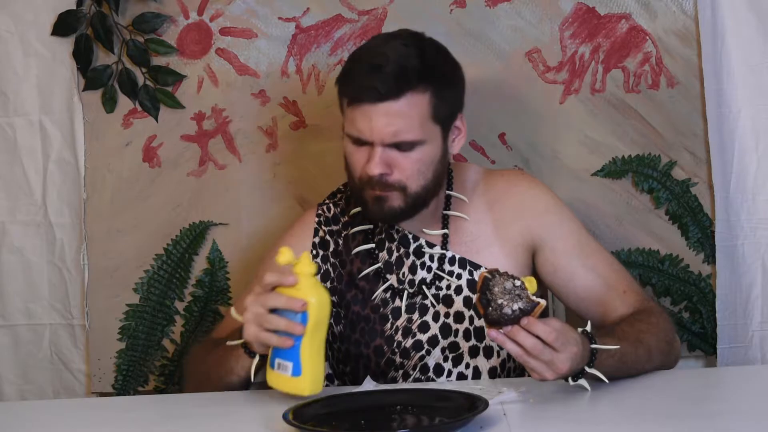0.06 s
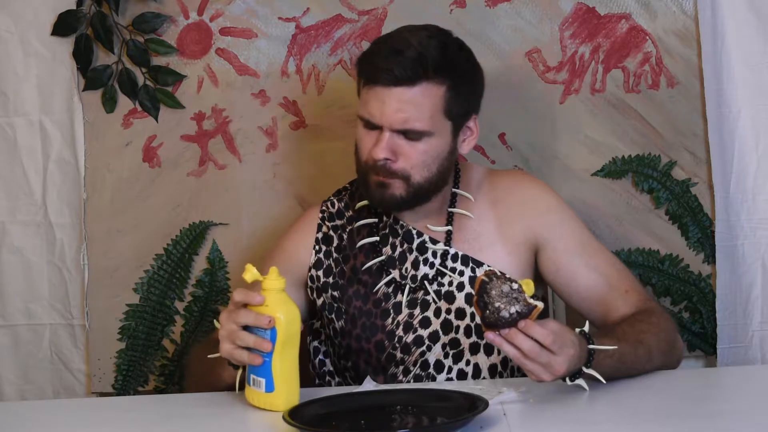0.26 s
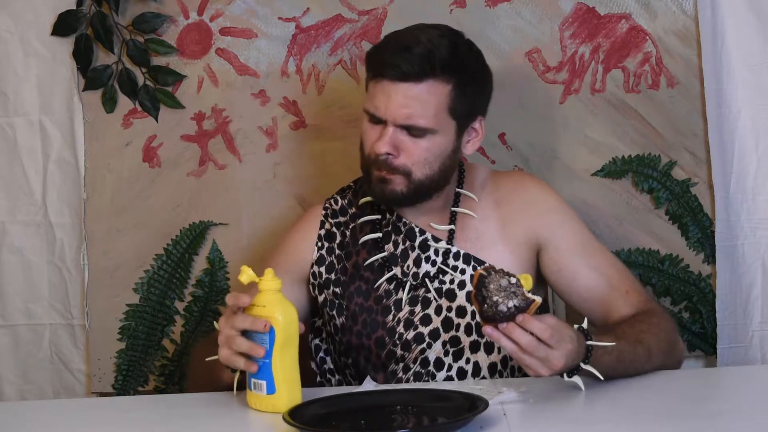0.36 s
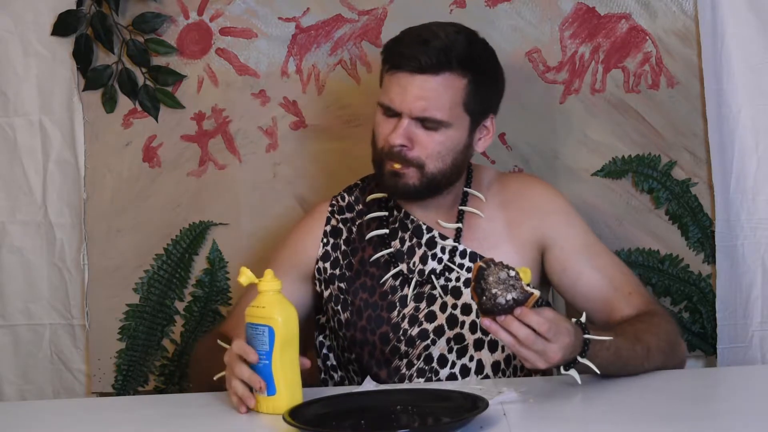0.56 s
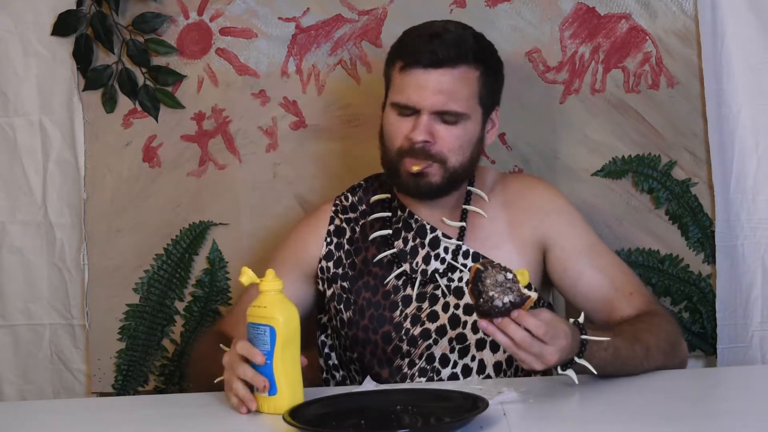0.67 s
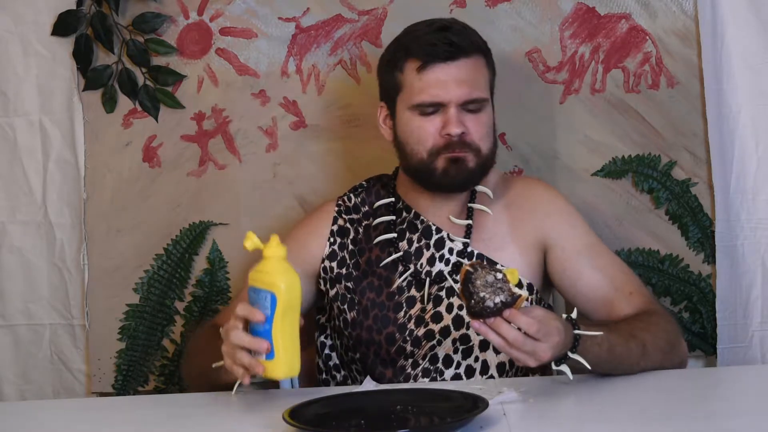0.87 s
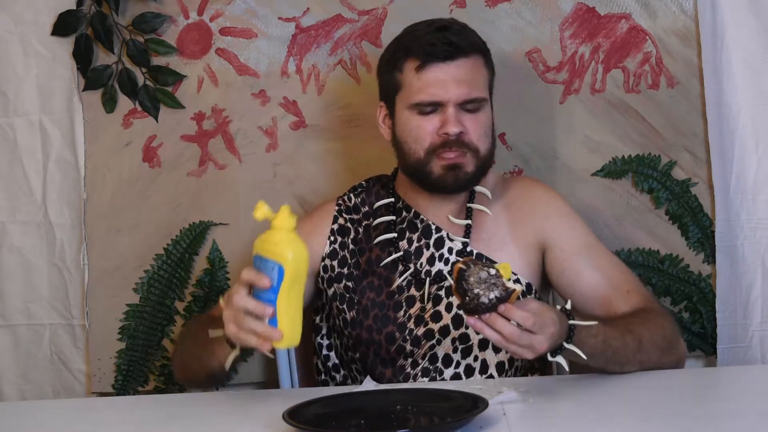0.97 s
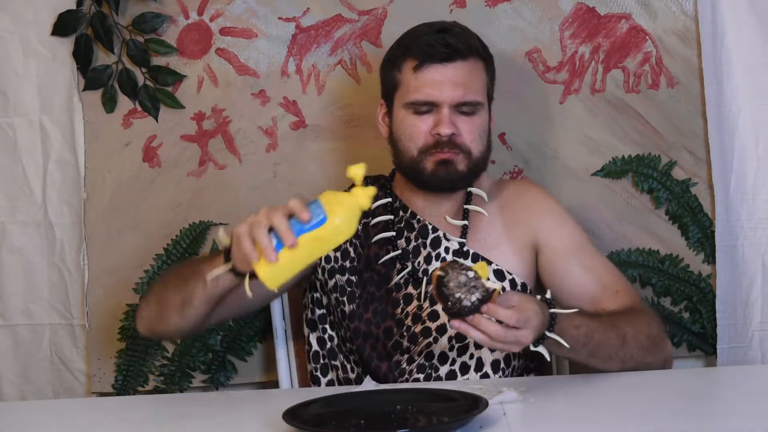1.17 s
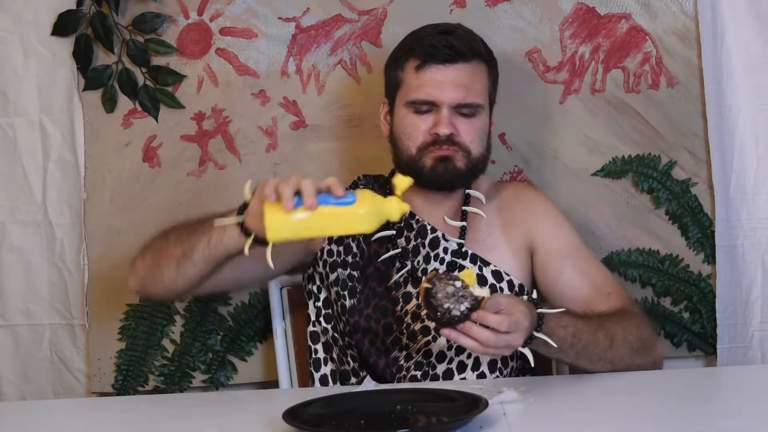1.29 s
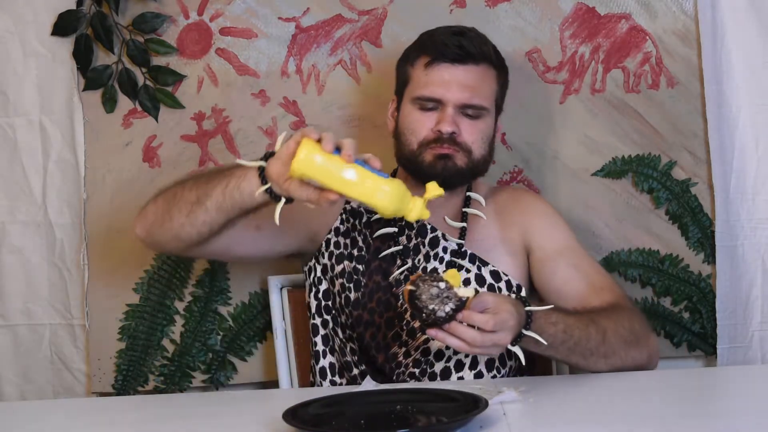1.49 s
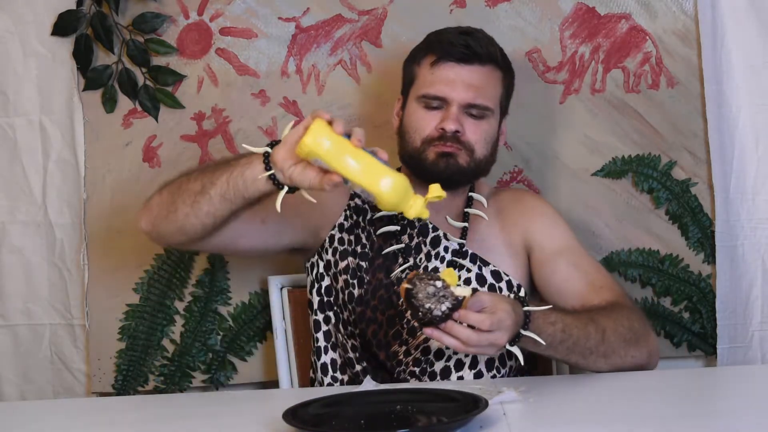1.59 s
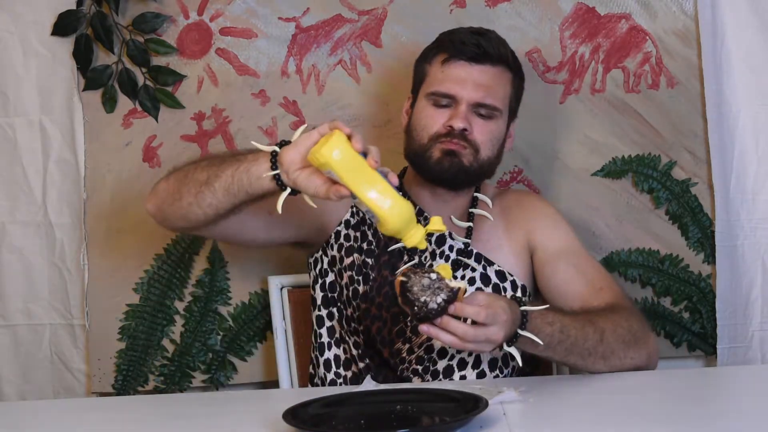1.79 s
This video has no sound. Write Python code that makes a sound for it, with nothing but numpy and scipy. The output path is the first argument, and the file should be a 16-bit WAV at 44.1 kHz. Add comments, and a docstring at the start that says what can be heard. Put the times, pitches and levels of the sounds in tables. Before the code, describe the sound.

A plastic squeeze bottle is set on a hollow table: boomy thuds cluster at 0.24-0.5 s with low rubbing and dry, clicking wrist beads. Beads rattle again around 0.65-0.7 s, with a short hollow tone at 0.72. Thin cap ticks at 0.8, a light knock at 0.85 and beads until 0.97 follow. A hollow gulping knock comes at 1.08, a weaker one at 1.23, then near-silent taps around 1.7. Small room, faint wavering hum.

```python
"""A hollow table top booms in knocks as a plastic squeeze bottle is set down, then lifted and tipped.
The table is a sum of decaying sine modes; beads at the wrist rattle as impulses exciting resonances.
The cap ticks in short bursts of high noise; gulps of thick sauce and late knocks are wavering, sliding tones.
Band noise gives the rubbing of hand and cloth and the roughness of the late knocks and gulps.
A small room reflects it all over a quiet, wavering hum.
"""
import sys
import numpy as np
from scipy import signal
from scipy.fft import rfft, irfft
from scipy.io import wavfile
from scipy.ndimage import uniform_filter1d

SR = 44100
rng = np.random.default_rng(int(sys.argv[2]) if len(sys.argv) > 2 else 0)


def master_out(mix):
    """Clip the mix to full scale and print it as 16-bit PCM to the path in sys.argv[1]."""
    frames = np.transpose(np.atleast_2d(mix))
    ceiling = np.clip(frames, -1, 1)
    pcm = np.round(ceiling * 32767).astype(np.int16)
    wavfile.write(sys.argv[1], SR, pcm)


N = 81585
T = np.arange(N) / SR  # time axis, s
F = np.arange(N // 2 + 1) * SR / N + 1e-3  # frequency axis, Hz, kept off zero for division and log

# Spectrum of the room hum, relative: [f/Hz, density level/dB]
HUM_SPECTRUM = [(15, -46), (25, -8), (102, 3.5), (290, -13.5), (459, -20), (618, -10.5), (726, -15),
                (877, -30), (2310, -31.5), (3030, -28), (6440, -25.5), (9400, -22), (15700, -25.5)]
# Side signal of the hum relative to its mid signal: [f/Hz, level/dB]
HUM_SIDE_LEVELS = [(60, -4), (110, -21), (200, -12), (380, -6), (700, -2), (1290, 1.5), (2380, -1.5),
                   (4400, 3), (8120, 1.5), (15000, 0.5)]
HUM_DB, HUM_WAVER_DB = -65.5, 2.5  # mid rms level; spread of the random levels before smoothing

# Rubbing, and the rough noise of the late knocks and gulps:
# [onset t/s, level/dB, centre f/Hz, width f/Hz, swell t/s, hold t/s, t60/s]
NOISE_BANDS = [(0.11, -59.5, 170, 107, 0.015, 0.12, .1), (0.22, -52, 360, 710, 0.0296, 0.055, 0.016),
               (0.41, -52, 2300, 3400, 0.037, 0.079, .02), (0.29, -46.5, 130, 160, 0.022, 0.35, 0.14),
               (0.669, -50.5, 258, 640, 0.011, 0.074, 0.39), (1.081, -59, 2040, 140, .002, 0.012, 0.11),
               (0.837, -63, 236, 186, 0.0041, 0.29, 0.26), (1.103, -50.5, 233, 177, 0.0041, 0.051, 0.33),
               (1.082, -52, 750, 660, 0.0023, 0.023, 0.26), (1.226, -61, 207, 174, 0.005, 0.093, 0.18),
               (1.245, -58, 660, 240, 0.0033, 0.028, 0.12), (1.596, -71, 304, 230, 0.068, 0.226, 0.084),
               (1.636, -78, 2630, 680, 0.043, 0.21, .1), (1.082, -65, 3115, 470, 0.0016, 0.02, 0.34),
               (1.69, -75, 520, 900, 0.025, 0.17, 0.11), (1.515, -69, 697, 100, 0.013, 0.044, 0.16)]

# Modes of the table top, the two strongest first: [f/Hz, relative level/dB, attack t/s, t60/s]
TABLE_MODES = [(145, 0, .008, .075), (270, 0, .0015, .31), (188, -6, .002, .2), (335, -7, .006, .12),
               (425, -6, .003, .09), (550, -9, .001, .05), (720, -13, .001, .05), (895, -15, .001, .06)]
# Onsets of the knocks: [t/s]
KNOCK_TIMES = [.236, .2804, .425, .4505, .4918, .854]
# Strength of each knock, added to the mode levels: [first listed mode level/dB, second listed mode level/dB,
# other modes level/dB, shudder level/dB, hold of the first listed mode t/s]
KNOCKS = [(-26, -23, -27, -36, .07), (-50, -25.5, -38, -42, .03), (-40, -39, -50, -50, .015),
          (-24.5, -33, -23, -33, .035), (-30, -38, -32, -38, .035), (-66, -47, -66, -66, .002)]
TABLE_WOBBLE = .1  # rms unevenness of each mode's amplitude
SHUDDER_HZ, SHUDDER_WIDTH_HZ, SHUDDER_T60_S = 323, 800, 0.33

# Onsets of the bead rattles: [t/s]
RATTLE_TIMES = [.2365, .2435, .269, .328, .4505, .464, .520, .6636, .694, .712, .885, .9024, .918, .935,
                .971]
# Each rattle, before filtering: [first click level/dB, later clicks level/dB, centre f/Hz, width f/Hz,
# hold t/s, t60/s]
RATTLES = [(-22, -41, 1680, 850, 0.0057, 0.03), (-24.5, -35.5, 2900, 2500, 0.0082, 0.14),
           (-36.5, -34, 2100, 1800, 0.0053, 0.031), (-32.5, -48.5, 1950, 1180, 0.0041, 0.19),
           (-19, -29, 2000, 4000, 0.0041, 0.083), (-29.5, -34, 2065, 2400, 0.016, 0.58),
           (-23, -34, 2390, 2300, 0.0097, 0.091), (-20.5, -39, 2640, 1800, 0.003, 0.067),
           (-20.5, -34.5, 3100, 2600, 0.0072, 0.04), (-54, -48, 2420, 1060, 0.0072, 0.36),
           (-37, -52.5, 2000, 2500, 0.026, 0.024), (-25.5, -39, 2390, 2270, 0.015, 0.053),
           (-33, -43, 2100, 6000, 0.021, 0.047), (-50, -44, 2450, 1800, 0.015, 0.064),
           (-44, -48.5, 3040, 540, 0.0016, 0.022)]
# Resonances of the beads: [f/Hz, width f/Hz, level/dB]
BEAD_MODES = [(1188, 290, 0), (1515, 280, 1), (1947, 340, 1), (2214, 198, 1), (2490, 400, -4),
              (2842, 200, 0), (3003, 200, 1), (3540, 410, -3.5), (4160, 310, -7), (5500, 1400, -12.5),
              (11000, 490, -10)]
CLICKS_PER_S, CLICK_SPREAD_DB = 4000, 2.5

# Onsets of the hollow tones of gulps and late knocks: [t/s]
TONE_TIMES = [.721, .7289, 1.0795, 1.08, 1.0815, 1.079, 1.097, 1.0992, 1.2295, 1.708, 1.748]
# Hollow tones of gulps and late knocks: [level/dB, starting f/Hz, t60/s]
TONES = [(-44.5, 636, 0.059), (-40.5, 636, 0.05), (-38, 1230, .045), (-39, 890, .05), (-43, 610, .05),
         (-45, 340, .05), (-47, 2130, 0.02), (-30, 301, 0.027), (-46.5, 658, 0.084), (-64, 660, 0.034),
         (-64, 330, 0.11)]
TONE_ATTACK_S, TONE_HOLD_S = .0008, .004
TONE_GLIDE = -.02  # phase bend; the frequency falls by twice this fraction in one t60
TONE_WOBBLE, TONE_STEADY_S = .6, .012  # rms amplitude wobble; time constant with which it sets in

# Ticks of the cap, before filtering: [onset t/s, level/dB, centre f/Hz, width f/Hz, puff level/dB]
TICKS = [(0.7946, -31, 7830, 4100, -63), (0.8302, -44, 7000, 3950, -63.5)]
TICK_T60_S, PUFF_T60_S = .005, .2

ROOM_GAP_S, ROOM_T60_S = 0.0084, 0.17
SMALL_ROOM_DB, SMALL_SIDE_DB = -5, -14  # reflections of noise bands, beads and cap
BOOM_ROOM_DB, BOOM_SIDE_DB = -25, -4.5  # reflections of table and hollow tones
LOW_CUT_HZ, TOP_HZ = 31, 15800


def undb(db):
    """Logarithmic level: a level in dB gives an amplitude ratio."""
    return 10 ** (np.asarray(db) / 20)


def shape(at, attack, hold, t60):
    """Exponential relaxation: saturating attack, hold, then a fall of 60 dB per t60."""
    t = np.maximum(T - at, 0)
    rise = 1 - np.exp(-t / max(attack, 1e-4))
    return rise * undb(-60 * np.maximum(t - hold, 0) / max(t60, 1e-3))


def bell(hz, width):
    """Damped resonator: a causal second-order response with unit gain at its centre."""
    return 1 / (1 + 1j * (F / width - hz ** 2 / (F * width)))


def colour(x, gain):
    """Linear filtering: the spectrum is multiplied by a frequency response."""
    return irfft(rfft(x) * gain, N)


def curve(points):
    """Spectral envelope: levels interpolated along log frequency, as gains."""
    hz, db = np.array(points).T
    return undb(np.interp(np.log(F), np.log(hz), db))


def noise(hz, width):
    """Band-limited noise: a cubed resonance shapes white noise, scaled to rms 1."""
    x = colour(rng.standard_normal(N), bell(hz, width) ** 3)
    return x / x.std()


def mid_side(mid, side):
    """Mid-side stereo: the side signal is added on the left and subtracted on the right."""
    return mid + side * np.array([[1], [-1]])


def hum():
    """Stationary coloured noise: low rumble and hiss, with slow amplitude modulation below 900 Hz."""
    mid = colour(rng.standard_normal(N), curve(HUM_SPECTRUM))
    side = colour(rng.standard_normal(N), curve(HUM_SPECTRUM))
    steps = np.repeat(rng.standard_normal(N // 2000 + 1), 2000)[:N]
    waver = uniform_filter1d(steps, size=2000)
    low = colour(mid, F < 900)
    mid = mid + low * (undb(HUM_WAVER_DB * waver) - 1)
    return mid_side(mid, colour(side, curve(HUM_SIDE_LEVELS))) * undb(HUM_DB) / mid.std()


def rubbing_and_roughness():
    """Enveloped band noise: rubbing hand and cloth, and the rough noise of the late knocks and gulps."""
    out = 0
    for at, db, hz, width, swell, hold, t60 in NOISE_BANDS:
        out = out + undb(db) * noise(hz, width) * shape(at, swell, hold, t60)
    return out


def table():
    """Modal superposition: each knock excites damped sine modes, and the loose top shudders as noise."""
    out = np.zeros(N)
    shudder = noise(SHUDDER_HZ, SHUDDER_WIDTH_HZ)
    rough = [1 + TABLE_WOBBLE * noise(25, 50) for _ in TABLE_MODES]
    # Modes adjacent in frequency have opposite signs
    frequency_rank = np.argsort(np.argsort([mode[0] for mode in TABLE_MODES]))
    signs = (-1) ** frequency_rank
    for at, (first_db, second_db, other_db, shudder_db, hold) in zip(KNOCK_TIMES, KNOCKS):
        out += undb(shudder_db) * shudder * shape(at, 0.00074, 0, SHUDDER_T60_S)
        for k, (hz, db, attack, t60) in enumerate(TABLE_MODES):
            size = undb(db + (first_db, second_db, other_db)[min(k, 2)])
            envelope = shape(at, attack, hold if k == 0 else 0, t60)
            out -= signs[k] * rough[k] * size * envelope * np.sin(2 * np.pi * hz * (T - at))
    return out


def beads():
    """Impulse excitation: a first click and dense uneven ones ring the beads, each rattle with its own tint."""
    is_click = rng.random(N) < CLICKS_PER_S / SR
    sizes = rng.choice([-1, 1], N) * undb(CLICK_SPREAD_DB * rng.standard_normal(N))
    clicks = is_click * sizes
    clicks = clicks / clicks.std()
    ring = 0
    for k, (hz, width, db) in enumerate(BEAD_MODES):
        ring = ring + (-1) ** k * undb(db) * bell(hz, width)
    spectrum = 0
    for at, (first_db, later_db, hz, width, hold, t60) in zip(RATTLE_TIMES, RATTLES):
        later = undb(later_db) * rfft(clicks * shape(at, 0.00074, hold, t60))
        first = 2 * undb(first_db) * np.exp(-2j * np.pi * F * at)  # spectrum of an impulse at the onset
        tint = bell(hz, width) ** 2 * np.sqrt(SR / width)  # narrow bands are raised to offset lost energy
        spectrum = spectrum + (later + first) * tint
    return irfft(spectrum * ring, N)


def hollow_tones():
    """Damped oscillation: tones of gulps and late knocks start firm, then waver and slide down as they fade."""
    wobble, out = TONE_WOBBLE * noise(88, 94), 0
    for at, (db, hz, t60) in zip(TONE_TIMES, TONES):
        t = np.maximum(T - at, 0)
        tone = np.sin(2 * np.pi * hz * t * (1 + TONE_GLIDE * t / t60))
        unsteady = 1 + wobble * (1 - np.exp(-t / TONE_STEADY_S))
        out = out + undb(db) * shape(at, TONE_ATTACK_S, TONE_HOLD_S, t60) * tone * unsteady
    return out


def cap():
    """Transient and turbulent noise: thin high ticks, each amid a grainy puff of air from the nozzle."""
    white = rng.standard_normal(N)
    grain = np.abs(np.repeat(rng.standard_normal(N // 40 + 1), 40)[:N]) ** 1.5  # 40-sample steps
    out = 0
    for at, db, hz, width, puff_db in TICKS:
        tick = undb(db) * shape(at, 0.00022, 0, TICK_T60_S)
        puff = undb(puff_db) * grain * shape(at - .03, 0.01, 0.038, PUFF_T60_S)  # begins 30 ms before
        out = out + colour(white * (tick + puff), 2 * bell(hz, width) ** 3)
    return out


def room(x, side_db):
    """Diffuse reverberation: convolution with decaying noise, partly shared by left and right."""
    tail = rng.standard_normal((2, N)) * shape(ROOM_GAP_S, 0.0054, 0, ROOM_T60_S)
    tail = tail / np.sqrt(np.sum(tail[0] ** 2))
    mid, side = signal.fftconvolve(x[None], tail, axes=1)[:, :N]
    return mid_side(mid, undb(side_db) * side)


def scene():
    """Linear superposition: direct sounds, their room reflections and the hum add."""
    small = rubbing_and_roughness() + beads() + cap()
    boom = table() + hollow_tones()
    small_room = undb(SMALL_ROOM_DB) * room(small, SMALL_SIDE_DB)
    boom_room = undb(BOOM_ROOM_DB) * room(boom, BOOM_SIDE_DB)
    return boom + small + small_room + boom_room + hum()


def record(dry):
    """Band limitation: the microphone chain drops the deep bass and cuts the top."""
    low_cut = signal.butter(2, LOW_CUT_HZ, "high", fs=SR, output="sos")
    top_cut = signal.ellip(12, .2, 90, TOP_HZ, fs=SR, output="sos")
    return signal.sosfilt(top_cut, signal.sosfilt(low_cut, dry))


dry = scene()
out = record(dry)
master_out(out)
```